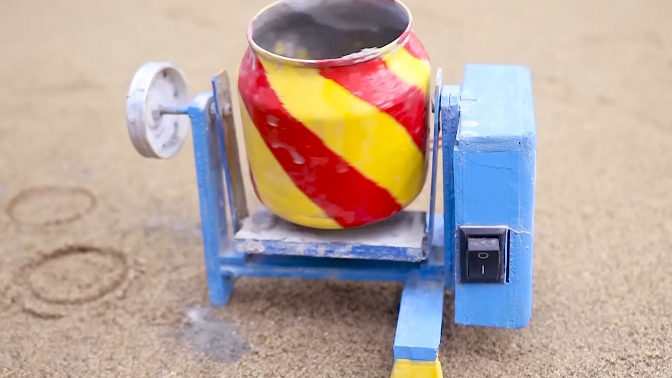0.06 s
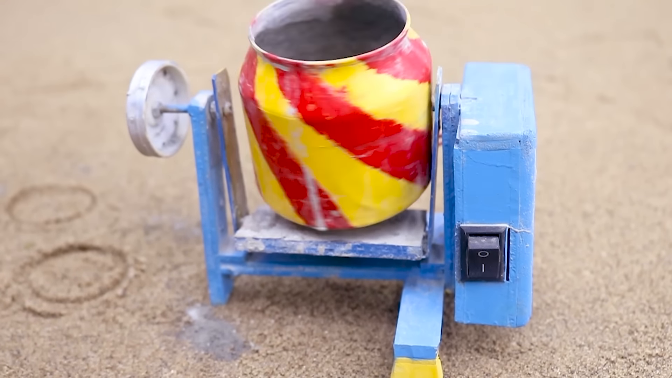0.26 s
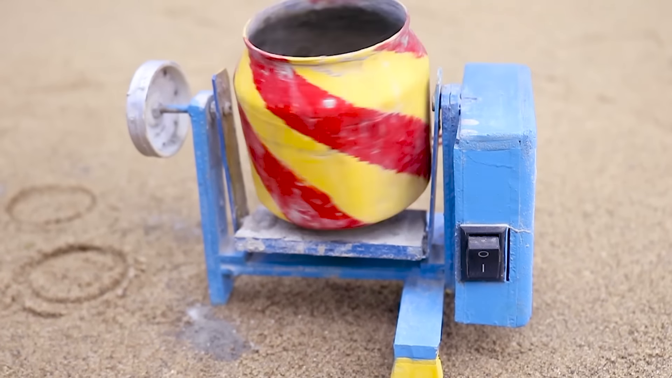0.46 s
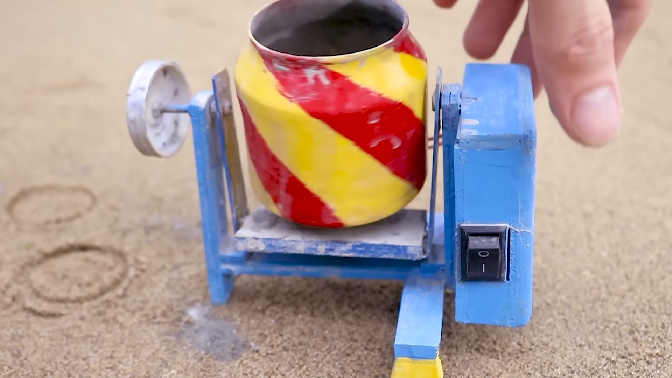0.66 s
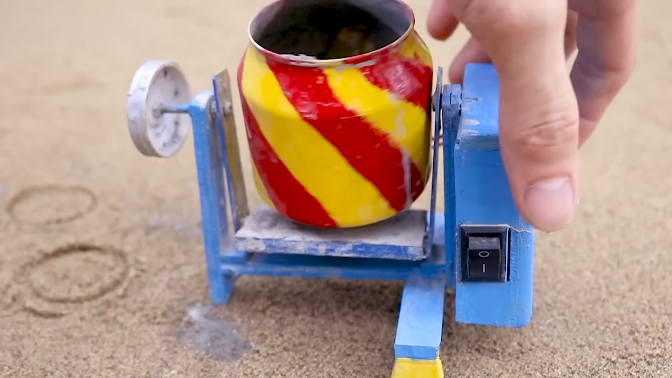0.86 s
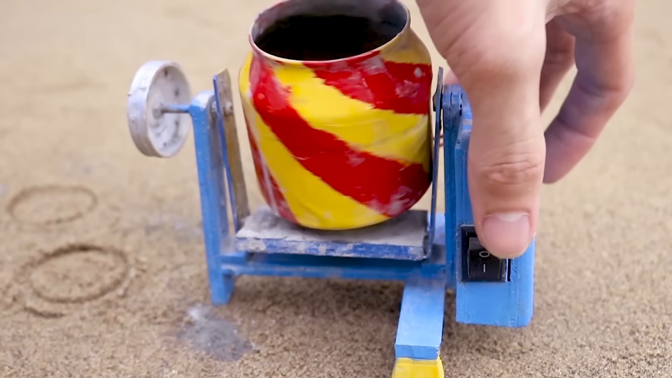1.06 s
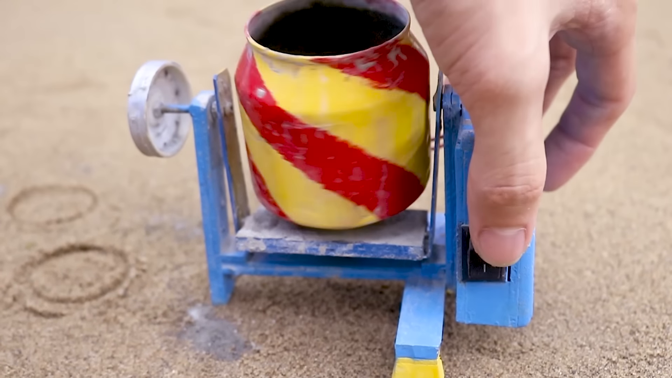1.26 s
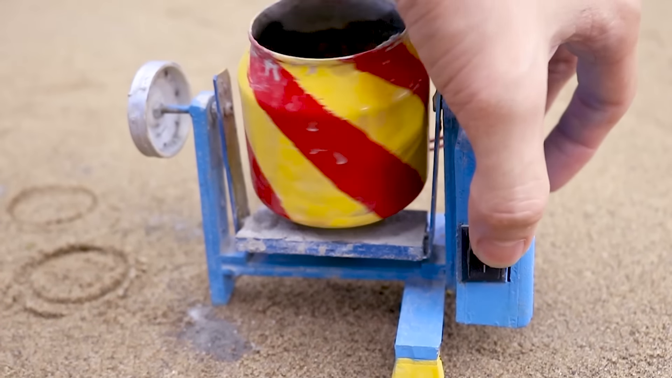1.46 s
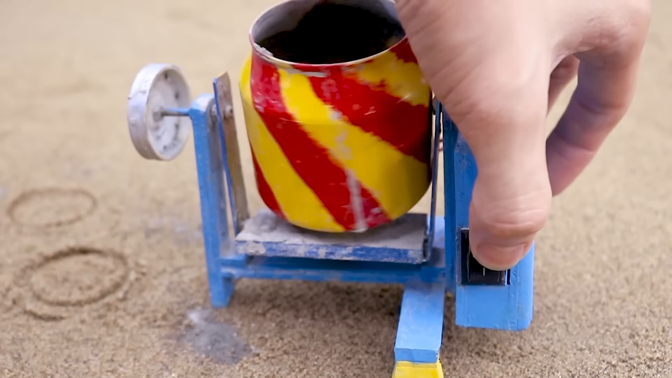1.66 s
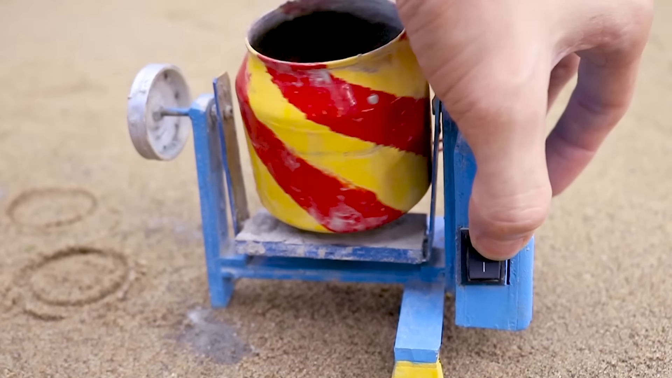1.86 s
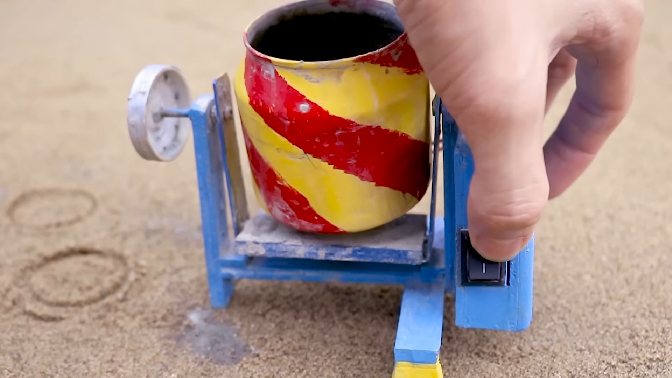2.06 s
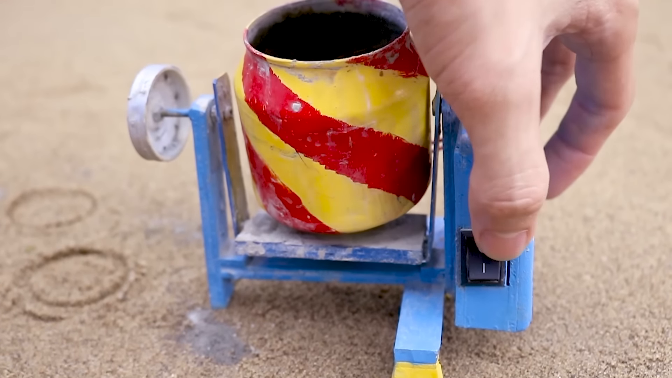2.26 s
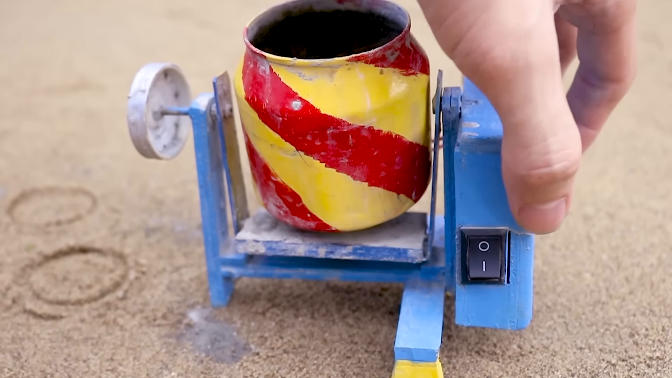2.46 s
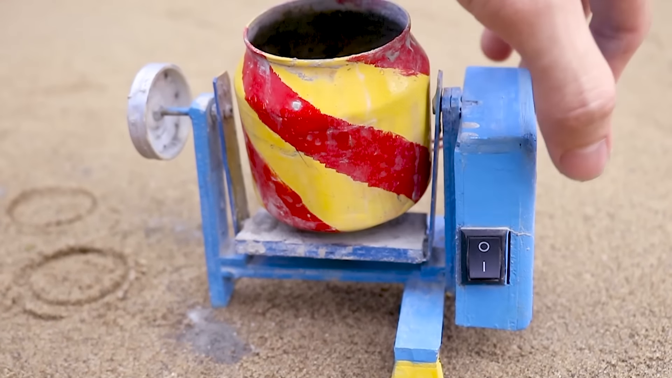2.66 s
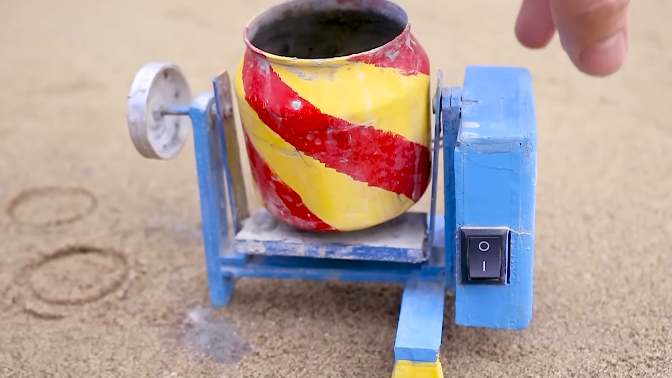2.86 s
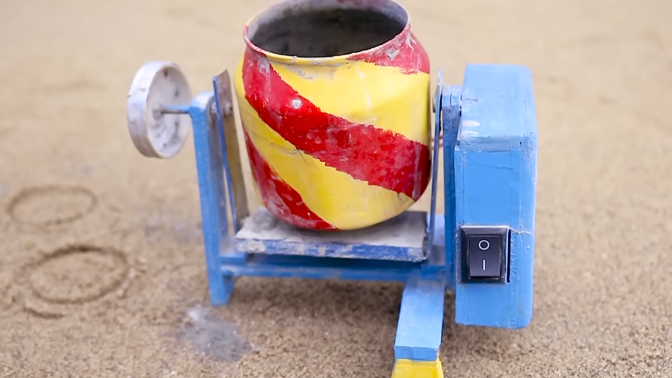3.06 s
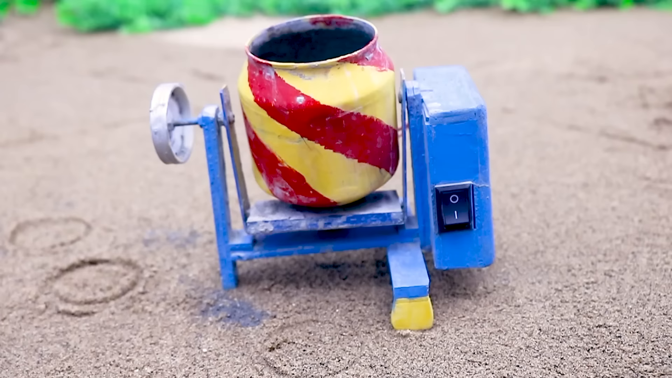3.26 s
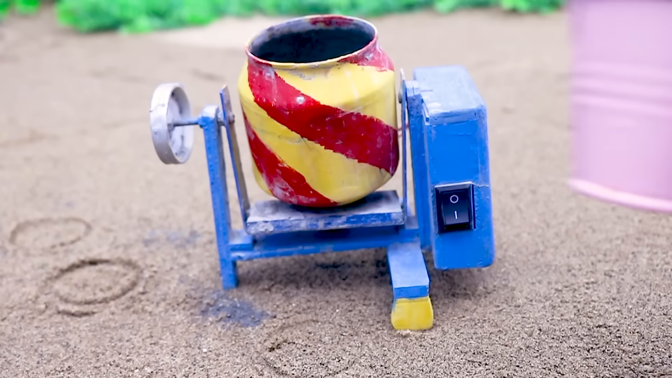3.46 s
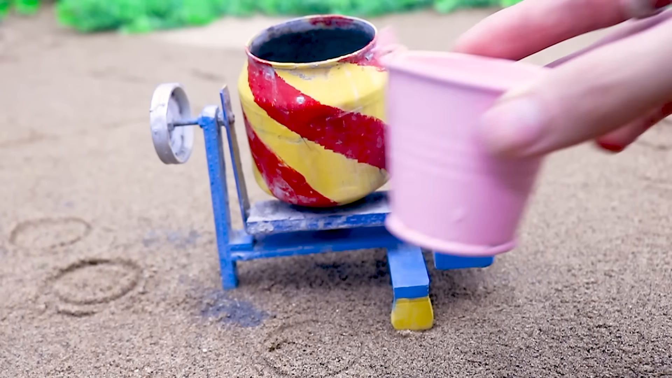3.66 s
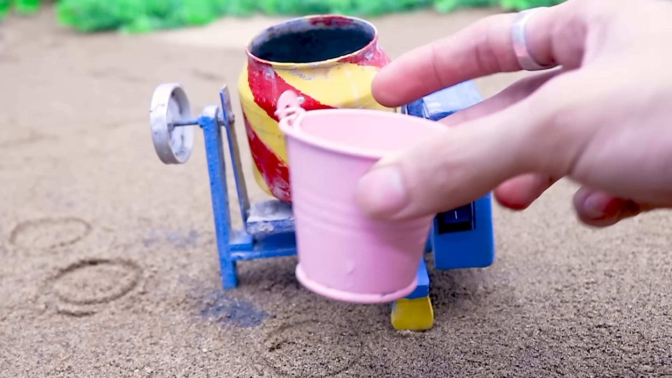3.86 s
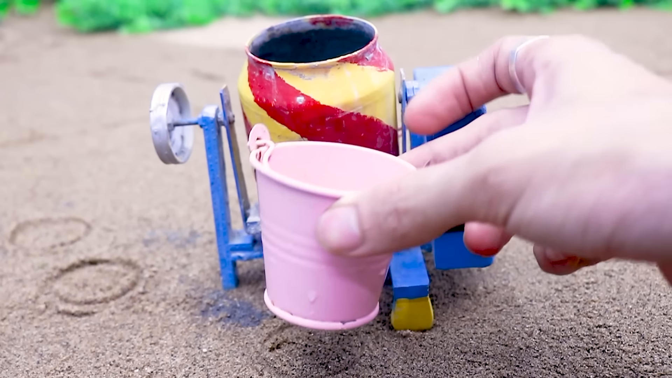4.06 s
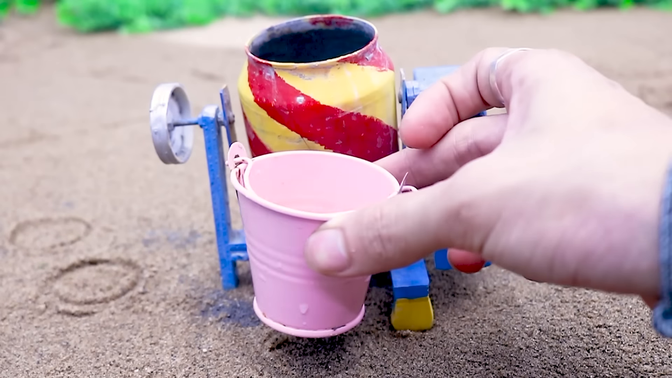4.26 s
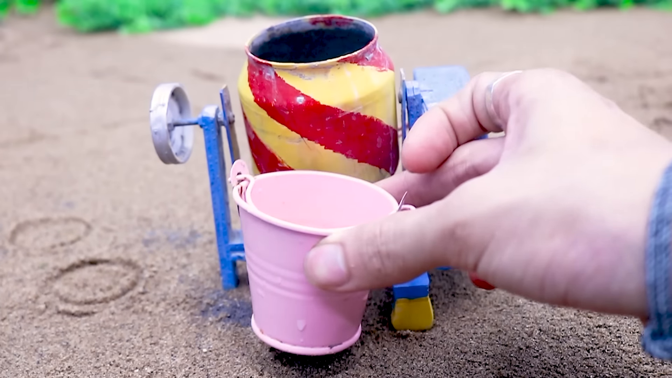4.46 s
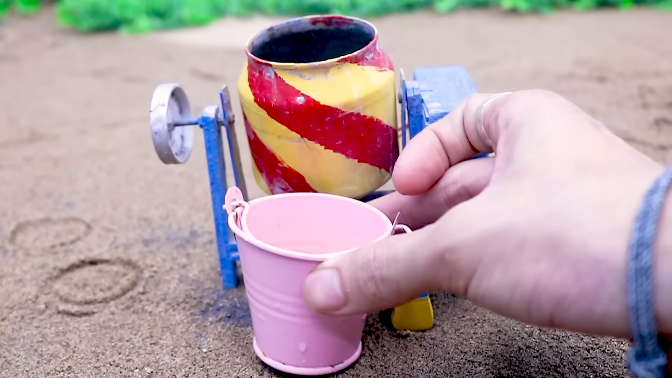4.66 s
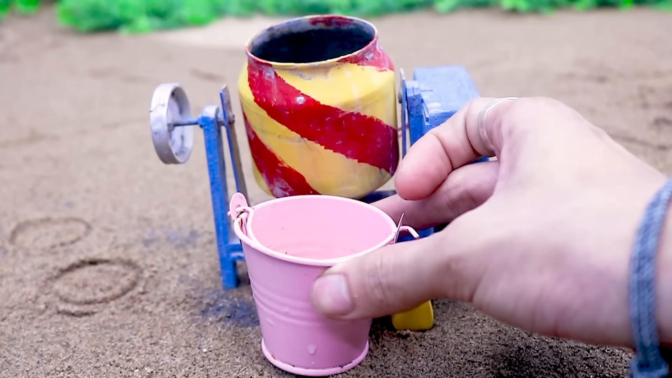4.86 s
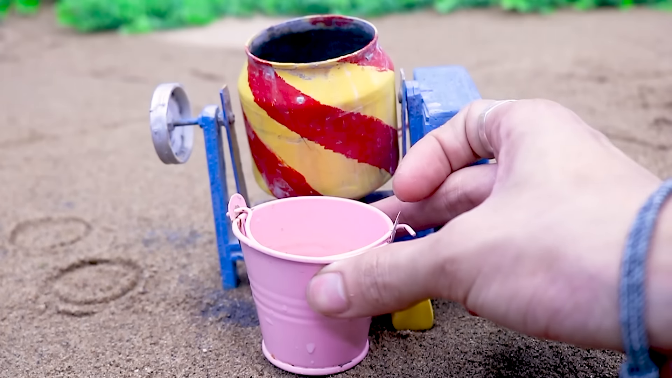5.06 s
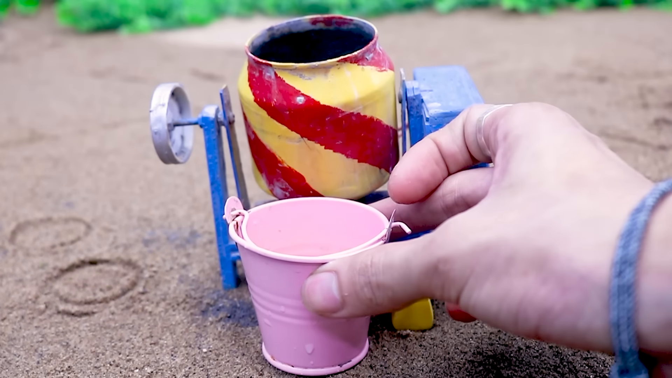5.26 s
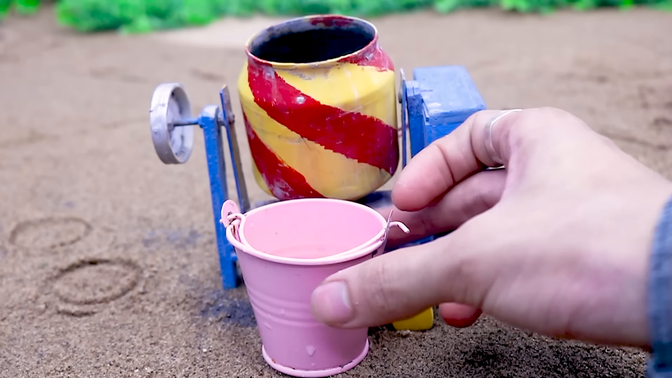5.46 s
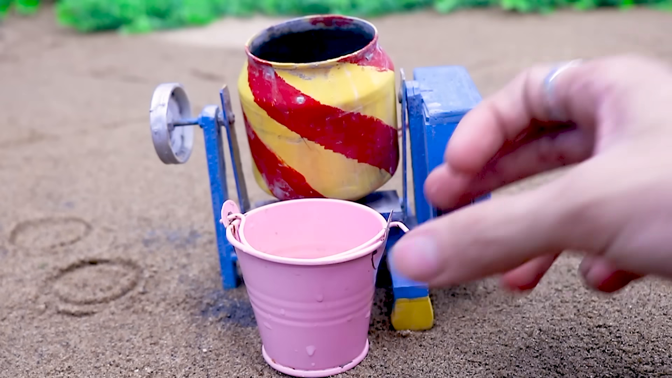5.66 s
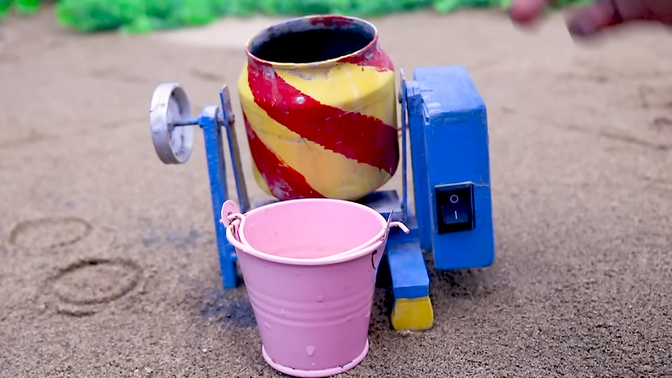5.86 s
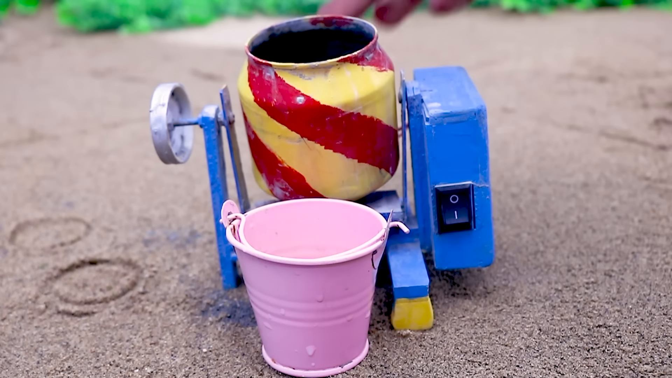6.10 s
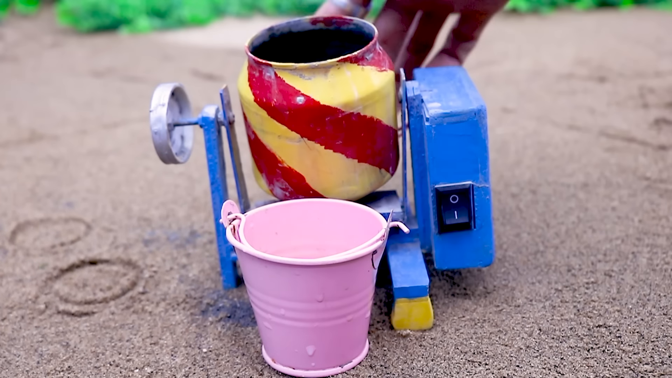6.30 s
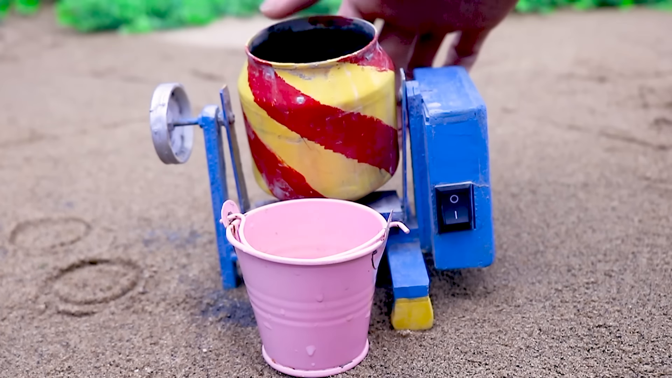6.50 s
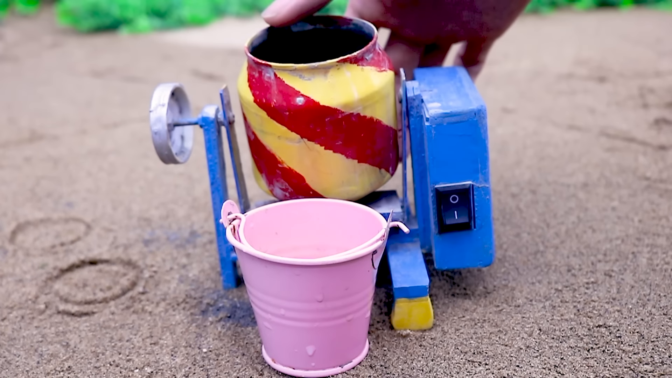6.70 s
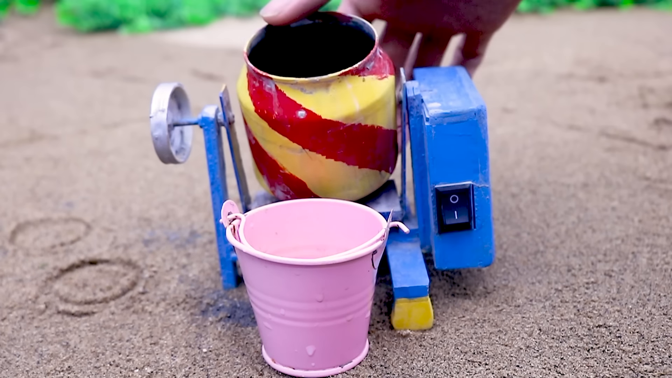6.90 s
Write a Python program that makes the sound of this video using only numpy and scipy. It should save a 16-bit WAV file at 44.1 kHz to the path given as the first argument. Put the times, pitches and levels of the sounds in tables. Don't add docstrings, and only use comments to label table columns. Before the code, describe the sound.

A toy mixer churns gravelly slurry, clicks off abruptly; quiet garden birds follow, then a small metal bucket knocks down, ringing and jingling.

```python
import sys
import numpy as np
from scipy import signal
from scipy.fft import rfft, irfft, next_fast_len
from scipy.io import wavfile
from scipy.ndimage import uniform_filter1d, map_coordinates

SR = 44100
rng = np.random.default_rng(int(sys.argv[2]) if len(sys.argv) > 2 else 0)


def boost_factor(decibels):
    exponent = np.asarray(decibels, float) / 20
    return 10 ** exponent


def file_out(sig):
    cols = np.atleast_2d(sig).T
    lim = np.clip(cols, -1, 1)
    pcm = np.round(lim * 32767).astype(np.int16)
    wavfile.write(sys.argv[1], SR, pcm)


N = 305613


def unit(x):
    return x / np.sqrt(np.mean(x ** 2) + 1e-20)


def along(points, hz):
    f, v = np.transpose(points)
    return np.interp(np.log(hz + 1), np.log(f + 1), v)


def curves(rows):
    s, *cols = np.transpose(rows)
    return [np.interp(np.arange(N) / SR, s, c) for c in cols]


def wobble(rate_hz, count=N):
    knots = rng.standard_normal(int(count / SR * 400) + 4)
    return map_coordinates(knots, [np.arange(count) * min(rate_hz, 400) / SR])


def filtered(x, response):
    m = next_fast_len(x.shape[-1] + 8192)
    return irfft(rfft(x, m) * response(np.fft.rfftfreq(m, 1 / SR)), m)[..., :x.shape[-1]]


def coloured(x, spectrum):
    return filtered(x, lambda hz: boost_factor(along(spectrum, hz)))


def modes(table):
    def response(f):
        total = 0
        for k, (hz, width, db) in enumerate(table):
            loss = 1j * f * abs(width)
            total = total + (-1) ** k * boost_factor(db) * loss / (hz * hz - f * f + loss + 1e-9)
        return total
    return response


# frequency in Hz, left-right likeness.
NEAR_LIKENESS = [(60, 0.62), (200, 0.87), (700, 0.94), (2400, 0.89), (5000, 0.58), (15000, .8)]


def rush(spectrum, patchy_db, grain_db=0, body=lambda hz: 1, alike=NEAR_LIKENESS):
    grains = rng.standard_normal((2, N)) * boost_factor(grain_db * wobble(350))
    z = signal.stft(grains, nperseg=512)[2]
    field = uniform_filter1d(rng.standard_normal(z.shape[1:]), size=5, axis=0)
    field = uniform_filter1d(field, size=8, axis=1)
    pair = signal.istft(z * boost_factor(patchy_db * unit(field)), nperseg=512)[1][:, :N]

    def response(hz):
        turn = np.arccos(np.clip(along(alike, hz), -1, 1)) / 2
        return boost_factor(along(spectrum, hz)) * body(hz) * np.array([np.cos(turn), np.sin(turn)])

    mid, side = filtered(pair, response)
    return np.array([mid + side, mid - side]) / mid.std()


def tail(decays, count):
    hz, t, z = signal.stft(rng.standard_normal((2, count)), SR, nperseg=128)
    t60 = np.maximum(along(decays, hz), .01)[:, None]
    return signal.istft(z * boost_factor(-60 * t / t60), SR, nperseg=128)[1][:, :count]


def add(track, s, sound):
    part = track[..., round(s * SR):][..., :sound.shape[-1]]
    part += sound[..., :part.shape[-1]]


# time in seconds, level in dB over its mean.
CHURN = [(0.0, 3.5), (0.07, -2), (0.2, -2), (0.34, 1), (0.48, 2), (0.62, -1.4), (0.69, 0.5), (0.796, 1),
         (1.016, -3), (1.122, 3), (1.228, -0.5), (1.4, -0.5), (1.514, -1), (1.534, 5), (1.66, -1),
         (1.8, -0.5)]
# frequency in Hz, level in dB per Hz.
SLOSH = [(76, -31.5), (130, -4), (194, -6), (349, -1.5), (717, -2), (893, -1), (1110, -7), (1440, -4),
         (1640, -7), (2400, -11.5), (3120, -27), (5280, -120)]
GRIT = [(880, -33), (1500, -5), (1700, -2.5), (2630, -8), (3340, -6.5), (4060, -11), (5500, -13.5),
        (7150, -31), (12100, -120)]
SPRAY = [(2350, -31), (4000, -11), (6980, -1.5), (7720, -2.5), (10800, -4.5), (15200, -10), (16200, -16),
         (16500, -44)]
# frequency in Hz, width in Hz, level in dB.
DRUM = [(350.8, 360, -6), (510, 30, 0.5), (900, 48.4, -5), (1148, 61, 4), (1320, 49.4, 1), (1870, 59.3, -9),
        (3126, 67, -13.5), (3840, 61.3, -14)]
# frequency in Hz, level in dB.
HUM = [(96.9, -45), (355.3, -43.5), (425.3, -55.5)]
# time in seconds, half length in seconds, extra grit in dB.
SLIDE = [
    (0.346, .03, 2.5),
    (0.471, 0.038, 1.5),
    (1.125, .03, 0),
    (1.565, 0.05, 3),
]
SLOSH_DB, SLOSH_GROWS = -29, 0.47
GRIT_DB, GRIT_GROWS = -34.5, 1.27
SPRAY_DB, SPRAY_GROWS = -40.5, 1.4
STOP_S = 1.854


def mixer():
    t = np.arange(N) / SR
    churn_db, = curves(CHURN)
    slosh_db = SLOSH_DB + SLOSH_GROWS * churn_db
    grit_db = GRIT_DB + GRIT_GROWS * churn_db
    spray_db = SPRAY_DB + SPRAY_GROWS * churn_db
    for s, half_s, db in SLIDE:
        grit_db = grit_db + db * np.exp(-((t - s) / half_s) ** 4)
    wall = lambda hz: 1 + 0.79 * abs(modes(DRUM)(hz))
    slosh = boost_factor(slosh_db + 0.636 * wobble(25)) * rush(SLOSH, patchy_db=0.5, grain_db=-0.5, body=wall)
    grit = boost_factor(grit_db + 1.2 * wobble(30)) * rush(GRIT, patchy_db=1.5, grain_db=3)
    spray = boost_factor(spray_db + 0.87 * wobble(30)) * rush(SPRAY, patchy_db=1.8, grain_db=2.2)
    hum = 0
    for hz, db in HUM:
        hum = hum + boost_factor(db + 3 + 2.5 * wobble(14)) * np.sin(2 * np.pi * hz * t + .6 * wobble(12))
    after = np.maximum(t - STOP_S, 0)
    stop = 0.71 * boost_factor(-4000 * after) + 0.27 * boost_factor(-550 * after)
    return (slosh + hollow() + grit + spray + hum) * stop


# time in seconds, pitch in Hz, level in dB.
HOLLOW = [
    (0.0, 1045, -27),
    (0.036, 961, -40),
    (0.21, 1085, -39),
    (0.34, 979, -33.5),
    (0.396, 1127, -28.5),
    (1.514, 1028, -30),
    (1.582, 1192, -25),
    (1.684, 1028, -36.5),
    (1.85, 1099, -30),
]
HOLLOW_DB, HOLLOW_WIDTH_HZ = -4, 340


def hollow():
    hz, level_db = curves(HOLLOW)
    splashes = rng.standard_normal((2, N)) * boost_factor(1.8 * wobble(300))
    slow = filtered(splashes, lambda f: 1 / (1 + (2 * f / HOLLOW_WIDTH_HZ) ** 2))
    turn = 2 * np.pi * np.cumsum(hz) / SR
    return boost_factor(level_db + HOLLOW_DB) * unit(slow[0] * np.cos(turn) + slow[1] * np.sin(turn))


# start in seconds, peak in dB, rim ring in dB, top in dB.
PEBBLES = [(0.0455, -17, -18, -28), (0.1875, -16.5, -28, -18), (0.2097, -11, -4, -23),
           (0.252, -27, 3.5, -7), (0.314, -15, -6.5, -8), (0.369, -6.5, -18.5, -19),
           (0.409, -13.5, -7, -8.5), (0.4428, -18, -16, -5), (0.4793, -14, -16, -11),
           (0.5368, -22, -2.5, 5), (0.5779, -5.5, -18, -36), (0.702, -19.5, -19, -3),
           (0.7288, -9.5, -27, -30), (0.809, -14, -21, -16), (0.8518, -7.5, -25, -25),
           (0.921, -27, 0.5, -21), (0.9936, -16.5, 2, -11), (1.0431, -13.5, -6, -12.5),
           (1.1013, -3, -20, -24), (1.143, -7, -15, -13.5), (1.196, -16, -2.5, -11),
           (1.3021, -14.5, -7, -9), (1.3501, -12.5, -22, -20), (1.4138, -11.5, -14, -17),
           (1.4547, -15, -6.5, -30), (1.4679, -12.5, -5, -11), (1.56, -17, -16.5, -8),
           (1.6126, -13.5, -12.5, -15), (1.6396, -12, -6, -13.5),
           (0.002, -14, -23, -12), (0.267, -26.5, -10, -1), (0.335, -19.5, -25, -21),
          (0.548, -25.5, -4, -16), (0.75, -23, -27, -33), (0.962, -23.5, -7, -10),
          (1.0324, -22, -25.5, -27), (1.0832, -20, -15.5, -31), (1.118, -15, -2.5, -20),
          (1.2677, -26, -24, -28), (1.5152, -14, -25.5, -22.5), (1.5326, -13.5, -28, -23),
          (1.578, -15, -20, -20), (1.6851, -25, -20, -25), (1.7826, -22, -14, -10.5)]
# frequency in Hz, width in Hz, level in dB.
RIM = [(7760, 360, 5), (7650, 294, -5), (6400, 300, -8.5), (8090, 210, -12), (14670, 760, -9)]
# frequency in Hz, level in dB.
CRACK = [(1500, -34.5), (3000, -11.5), (4500, -6.5), (8000, -3.5), (10000, -14)]
TOP = [(7500, -27), (9500, -1), (12500, -15.5), (15500, -15), (17000, -60.5)]
BOUNCING_S = 0.009


def pebbles():
    out, t = np.zeros((2, N)), np.arange(SR // 12) / SR
    shape = boost_factor(-350 * t - 650 * np.maximum(t - BOUNCING_S, 0)) * (1 + 0.71 * boost_factor(-60 * t / 0.0053))
    for s, db, ring_db, top_db in PEBBLES:
        strengths = boost_factor(1.96 * rng.standard_normal(len(t)))
        clicks = rng.standard_normal((2, len(t))) * [[1], [.3]] * strengths * shape
        spot = [(hz * (1 + 0.01417 * rng.normal()), width, level + 4 * rng.normal()) for hz, width, level in RIM]
        crack = coloured(clicks, CRACK)
        rim = filtered(clicks, modes(spot))
        top = coloured(clicks, TOP)
        mid, side = sum(boost_factor(db + level - 12.0) * part / part[0, :SR // 80].std()
                        for level, part in ((-9, crack), (ring_db, rim), (top_db, top)))
        add(out, s, np.array([mid + side, mid - side]))
    return out


# start in seconds, peak in dB, box ring in dB, t60 in seconds.
SWITCH = [
    (1.8146, -7, -30, 0.014),
    (1.8384, 1, -13, 0.0058),
]
# frequency in Hz, level in dB per Hz.
SNAP = [(410, -27.5), (700, 5.5), (1040, -18), (2040, 3), (2810, -13), (3960, -0.5), (6890, -1.5),
        (8080, -10), (10400, -3), (16500, -29)]


def switch():
    out, t = np.zeros(N), np.arange(SR // 10) / SR
    colour = unit(coloured(rng.standard_normal((len(SWITCH), len(t))), SNAP))
    for (s, db, box_db, t60), hiss in zip(SWITCH, colour):
        snap = np.minimum(t / 0.0017, 1) ** 2 * boost_factor(-60 * np.maximum(t - .0012, 0) / t60)
        linger = boost_factor(-21.0 - 60 * t / 0.12)
        box = boost_factor(db + box_db + 2.5 - 60 * t / 0.047) * np.sin(2 * np.pi * 415 * t) * (1 - np.exp(-t / 0.00055))
        add(out, s, boost_factor(db - 3.5) * hiss * (snap + linger) - box)
    return out


# start in seconds, level in dB, clatter in dB.
KNOCKS = [
    (4.9598, -8, 0.5),
    (4.9706, -19, -4),
    (4.998, -10, -8.5),
    (5.026, -18, -3.5),
    (5.062, -25, -5),
    (5.083, -20.5, -1),
    (5.18, -37, -14),
]
# frequency in Hz, level in dB, t60 in seconds.
TIN = [(248, -1.5, 0.14), (818, -10.5, .3), (1063.4, -8.5, .5), (1247, -7, 0.4), (1482, -3.5, 0.39),
       (1820, -12, .25), (1934, -8, 0.24), (2170, -7, .15), (2440, -12, .25), (2587, -11, 0.22),
       (2890, -9.5, 0.15), (3170, -14, 0.25)]
# frequency in Hz, level in dB per Hz.
CLATTER = [(88, -62.5), (150, -33), (281, 4), (343, -3), (830, 1.5), (916, -5.5), (1280, 2), (1620, -3),
           (1930, -3), (15000, -27), (16500, -46)]
# frequency in Hz, t60 in seconds.
FADE = [(200, 0.24), (600, 0.29), (1200, 0.44), (3000, 0.32), (7000, 0.26), (15000, 0.25)]
# frequency in Hz, level in dB, t60 in seconds.
BELLY = (255, -32.5, 0.22)


def bucket():
    out, t = np.zeros((2, N)), np.arange(SR // 2) / SR
    for s, db, clatter_db in KNOCKS:
        ring = 0
        for hz, level, t60 in TIN:
            level_db = level + rng.normal(0, 1.9) + 3.4 * wobble(45, count=len(t)) - 60 * t / min(t60, .45)
            ring = ring + boost_factor(level_db) * np.sin(2 * np.pi * hz * t + 3.0 * rng.normal())
        noise = np.pad(tail(FADE, count=SR // 2), ((0, 0), (0, 200)))
        crunch = boost_factor(1.15 * wobble(300.0)[:len(t)])
        mid, side = coloured(noise, CLATTER)[:, :len(t)] * crunch
        clatter = np.array([mid + 0.57 * side, mid - 0.61 * side]) / mid[:SR // 50].std()
        add(out, s, boost_factor(db) * (boost_factor(-10.5) * ring + boost_factor(clatter_db - 7.0) * clatter))
    hz, db, t60 = BELLY
    add(out, KNOCKS[-1][0], boost_factor(db - 60 * t / t60 + 3 * wobble(25)[:len(t)]) * np.sin(2 * np.pi * hz * t))
    return out * boost_factor([[.5], [-.5]])


# start in seconds, level in dB.
HANDLE = [
    (5.055, -36),
    (5.066, -33.5),
    (5.075, -36),
    (5.088, -44),
    (5.11, -36),
    (5.122, -34),
    (5.135, -39.5),
]
# frequency in Hz, width in Hz, level in dB.
WIRE = [(4200, 1300, -6.5), (6500, 740, -1), (11500, 820, -15)]


def handle():
    out, t = np.zeros(N), np.arange(SR // 20) / SR
    for (s, db), hiss in zip(HANDLE, rng.standard_normal((len(HANDLE), len(t)))):
        add(out, s, boost_factor(db) * filtered(hiss * boost_factor(-60 * t / 0.055), modes(WIRE)) * 2.73)
    return out


# start in seconds, peak in dB, t60 in seconds.
TOUCH = [
    (2.5744, -38.5, 0.11),
    (3.363, -37, 0.2),
]
# time in seconds, frequency in Hz, level in dB, half length in seconds.
THUMP = (3.906, 60, -25, .016)


def hands():
    out, t = np.zeros(N), np.arange(SR // 5) / SR
    skin = lambda hz: modes([(4000, 3500, 0)])(hz) / (1 + (hz / 11000) ** 8)
    for s, db, t60 in TOUCH:
        brush = filtered(rng.standard_normal(len(t)), skin)
        add(out, s, boost_factor(db - 9 - 60 * t / t60) * (1 - np.exp(-t / .008)) * brush)
    s, hz, db, half_s = THUMP
    u = np.arange(N) / SR - s
    return out + boost_factor(db) * np.cos(2 * np.pi * hz * u) * np.exp(-((u - .004) / half_s) ** 2 / 2)


ATTACK_S, RELEASE_S, FADE_DB = 0.007, 0.0028, 6.5


def note(length_s, from_hz, to_hz, db, bend):
    t = np.arange(0, length_s, 1 / SR)
    ends = np.minimum(np.minimum(t / ATTACK_S, (length_s - t) / RELEASE_S), 1)
    flutter = uniform_filter1d(rng.standard_normal(SR // 2), size=300)[:len(t)]
    hz = (from_hz + (to_hz - from_hz) * bend(t / length_s)) * (1 + 0.045 * flutter)
    level = boost_factor(db + 8 - FADE_DB * t / length_s + 14 * flutter)
    return level * ends * np.sin(2 * np.pi * np.cumsum(hz) / SR)


# start in phrase in seconds, length in seconds, from Hz, to Hz, level in dB.
PHRASE = [
    (0, 0.039, 3165, 2670, -0.3),
    (0.081, 0.0349, 2874, 3617, -5),
    (0.13, 0.035, 2460, 1837, -7.5),
    (.16, 0.029, 1828, 1800, -20.5),
]
PICKUP = [
    (-.056, 0.024, 4740, 2536, -8.5),
    (-.025, 0.02, 2543, 2606, -3.5),
]
# start in seconds, level in dB.
REPEATS = [
    (3.599, -55.5),
    (3.91, -50),
    (4.216, -49),
    (4.524, -48.5),
    (4.824, -49),
    (5.135, -48),
    (5.451, -49),
    (5.78, -50.5),
]
# start in seconds, length in seconds, from Hz, to Hz, level in dB.
SETTLING = [(2.398, 0.17, 7740, 7760, -68.5), (2.659, 0.22, 7530, 7750, -70.5),
            (5.177, 0.064, 3090, 3780, -55), (5.574, 0.033, 6600, 4100, -50),
            (5.697, 0.064, 3290, 3175, -51), (5.794, 0.315, 4050, 4000, -60),
            (6.004, 0.044, 3590, 2820, -53), (6.24, 0.053, 3670, 3320, -50.5),
            (6.396, 0.047, 6400, 3740, -54), (6.617, 0.065, 4730, 4420, -53.5),
            (6.695, 0.025, 6600, 7860, -59), (6.72, 0.15, 7880, 8000, -68), (4.78, 0.031, 3400, 3230, -52),
            (5.28, 0.023, 3970, 3830, -56), (6.92, 0.013, 4600, 4460, -51), (6.848, 0.08, 6570, 6330, -55)]
# start in seconds, length in seconds, from Hz, to Hz, level in dB.
SWEEPING = [(4.37, 0.097, 3820, 3780, -60), (5.308, 0.014, 6400, 3980, -45.5),
            (5.605, 0.062, 4270, 4450, -56), (5.395, 0.052, 2890, 2830, -54.5),
            (5.41, 0.125, 4120, 4040, -54.5), (5.875, 0.062, 3180, 3330, -56.5),
            (5.95, 0.013, 3280, 3470, -45), (6.1, 0.027, 2760, 2890, -55), (6.18, 0.016, 2900, 3080, -52),
            (6.385, .017, 4670, 6720, -48.5), (6.52, 0.054, 3230, 2840, -58),
            (6.815, 0.03, 4670, 5340, -49.5), (6.843, 0.03, 5200, 6500, -54),
            (6.345, 0.03, 3750, 3460, -63), (6.765, .015, 2802, 4036, -64),
            (6.795, 0.0129, 3210, 4020, -56), (4.47, 0.088, 3754, 3680, -65)]
# start in seconds, length in seconds, from Hz, to Hz, level in dB.
ARCHING = [(2.045, 0.028, 7180, 8600, -60.5), (5.405, 0.14, 4080, 3410, -50),
           (5.76, 0.026, 3240, 3360, -48), (5.91, 0.04, 3310, 3720, -49), (6.145, 0.023, 2890, 3230, -51.5),
           (6.165, 0.02, 2920, 3260, -56), (6.272, 0.043, 3540, 2970, -56.5),
           (6.315, 0.03, 3280, 3690, -49.5), (6.555, 0.031, 2830, 3290, -57.5),
           (6.585, 0.035, 2780, 3370, -54.5), (6.775, 0.032, 3200, 3920, -58)]
# length in seconds, from Hz, to Hz, level in dB.
FLICK = (.022, 3691, 6288, -63)
FLICK_S, FLICK_GAP_S = 1.916, .153
# frequency in Hz, t60 in seconds.
GARDEN = [(300, .1), (3000, .45), (10000, .25)]


def birds():
    song = np.zeros(N)
    settle = lambda u: 1 - np.exp(-3 * u)
    sweep = lambda u: u
    arch = lambda u: np.sin(np.pi * u)
    phrases = []
    for k, (start, db) in enumerate(REPEATS):
        for s, length_s, from_hz, to_hz, level in PHRASE + PICKUP * (k > 0):
            phrases.append((start + s, length_s, from_hz, to_hz, db + level))
    flicks = [(FLICK_S + k * FLICK_GAP_S, *FLICK) for k in range(5)]
    for rows, bend in ((phrases + SETTLING, settle), (SWEEPING + flicks, sweep), (ARCHING, arch)):
        for s, *whistle in rows:
            add(song, s, note(*whistle, bend))
    lag_s = np.array([[.000022], [-.000022]])
    ears = filtered(song, lambda hz: np.exp(-2j * np.pi * hz * lag_s))
    echo = tail(GARDEN, count=SR // 2)
    echo = echo / np.linalg.norm(echo[0])
    return ears + boost_factor(-1.5) * signal.fftconvolve(song[None], echo, axes=1)[:, :N]


# frequency in Hz, level in dB per Hz.
TRAFFIC = [(11, -40), (20, -18.5), (49, 1.5), (83, -3.5), (349, -19.5), (558, -28.5), (919, -27),
           (1740, -37), (2780, -41), (4710, -61), (7140, -53.5), (7980, -59.5), (8670, -62.5), (11800, -63),
           (13500, -84)]
TWITTER = [(1000, -45.5), (1700, -25), (2420, 1), (3060, 4), (3410, 4.5), (3770, -11.5), (4600, -15),
           (5980, -54), (10100, -120)]
SIZZLE = [(2240, -30), (3800, 1), (4650, -5.5), (7490, -18.5), (8080, -21.5), (9000, -21), (11700, -42.5),
          (19800, -120)]
TRILL = [(3700, -51.5), (4150, -6), (4700, 3), (5100, -6), (5400, -49.5)]
TRAFFIC_DB = -40.5
# time in seconds, level in dB.
CHORUS = [
    (1.9, -64),
    (2.22, -73.5),
    (2.88, -71),
    (3.2, -75),
    (3.72, -74),
    (3.89, -65),
    (4.69, -56),
    (5.57, -60),
    (6.93, -60),
]
# time in seconds, level in dB.
TREETOP = [
    (1.9, -63),
    (2.6, -71.5),
    (3.1, -67.5),
    (3.6, -76),
    (4.4, -66),
    (5.06, -61),
    (5.9, -64.5),
    (6.93, -61.5),
]
# time in seconds, level in dB.
HAZE = [
    (1.9, -78),
    (2.75, -78),
    (2.9, -70.5),
    (3.3, -78),
    (3.7, -85.5),
    (3.74, -63.5),
    (4.2, -71.5),
    (4.7, -72),
    (5.2, -75.5),
    (6.93, -95),
]
# frequency in Hz, left-right likeness.
FAR_LIKENESS = [(25, 1), (60, 1), (200, 0.9), (700, 0.28), (1300, -0.34), (8000, 0.12)]


def air():
    (flock_db,), (treetop_db,), (insect_db,) = curves(CHORUS), curves(TREETOP), curves(HAZE)
    traffic = boost_factor(TRAFFIC_DB) * rush(TRAFFIC, patchy_db=0.88, alike=FAR_LIKENESS)
    flock = boost_factor(flock_db) * rush(TWITTER, patchy_db=2.5, alike=FAR_LIKENESS)
    treetop = boost_factor(treetop_db) * rush(SIZZLE, patchy_db=5.0, alike=FAR_LIKENESS)
    insects = boost_factor(insect_db) * rush(TRILL, patchy_db=4.0, alike=FAR_LIKENESS)
    return traffic + flock + treetop + insects


def scene():
    return mixer() + pebbles() + switch() + bucket() + handle() + hands() + birds() + air()


def low_pass(x):
    return signal.sosfilt(signal.butter(12, 17000, fs=SR, output="sos"), x)


def record(dry):
    soft = dry / (1 + abs(dry / .86) ** 6) ** (1 / 6)
    return low_pass(soft)


dry = scene()
out = record(dry)
file_out(out)
```